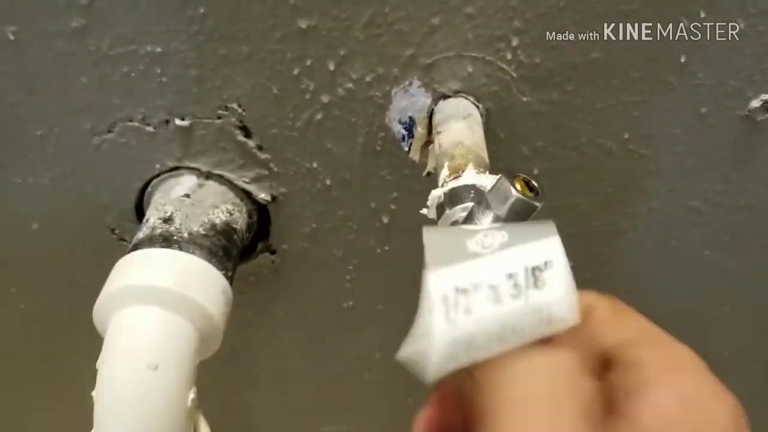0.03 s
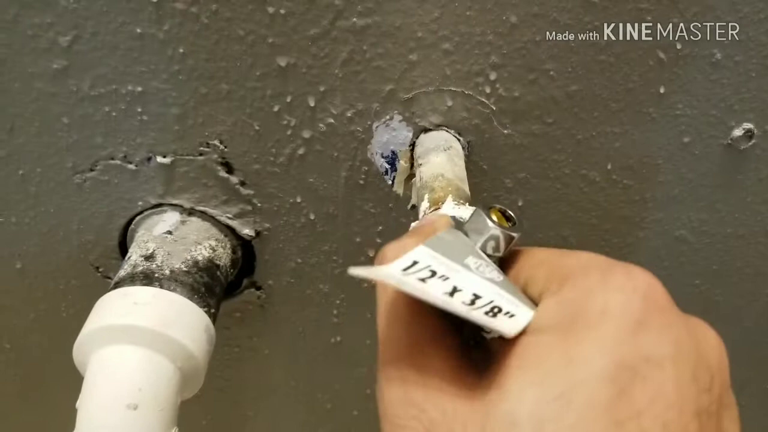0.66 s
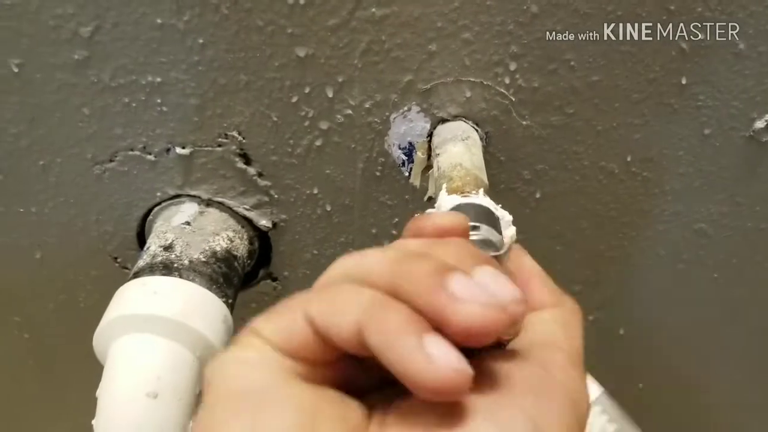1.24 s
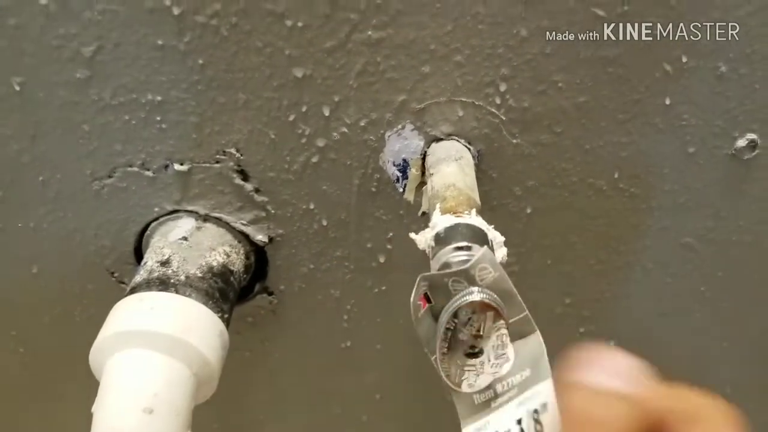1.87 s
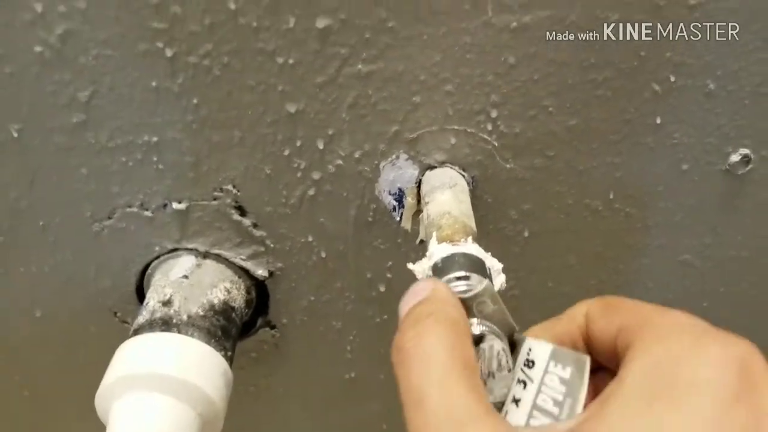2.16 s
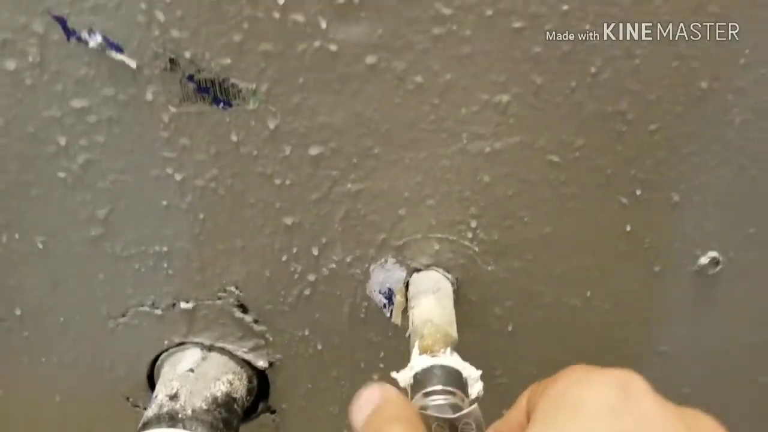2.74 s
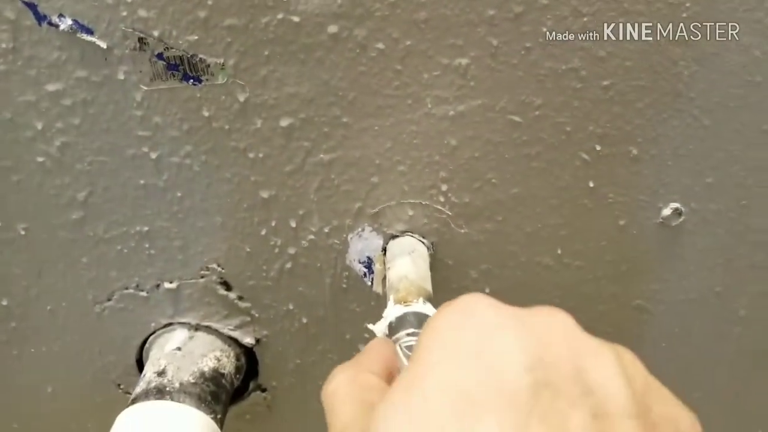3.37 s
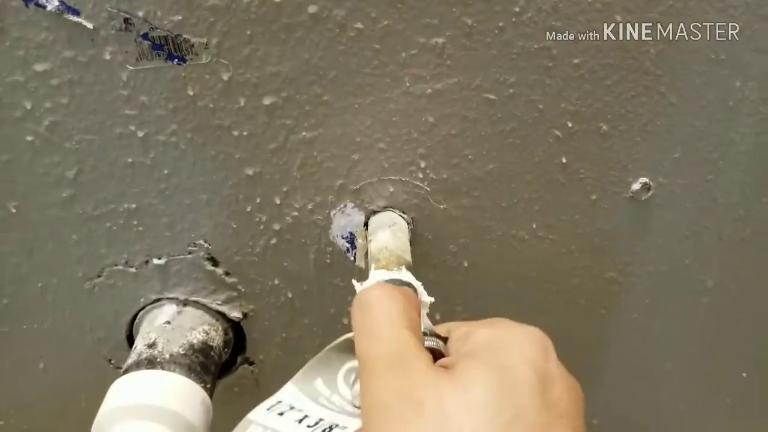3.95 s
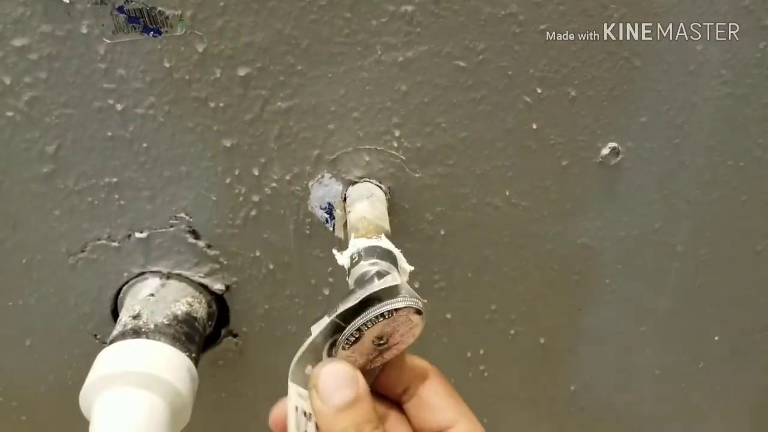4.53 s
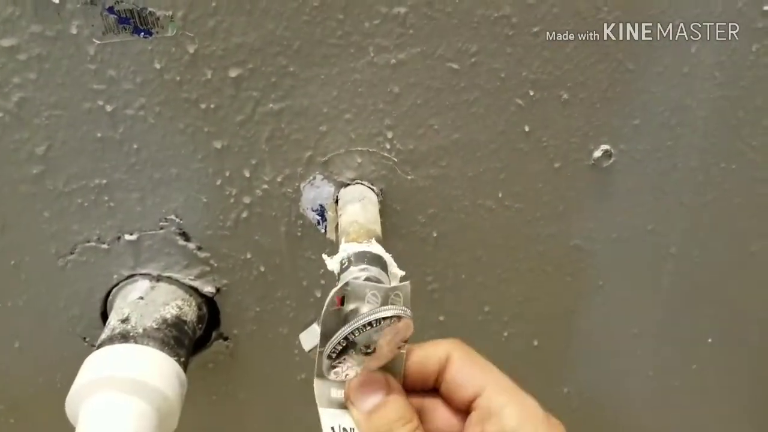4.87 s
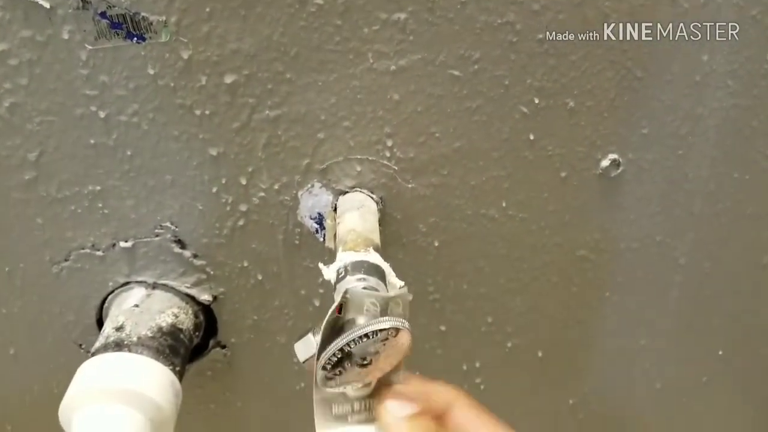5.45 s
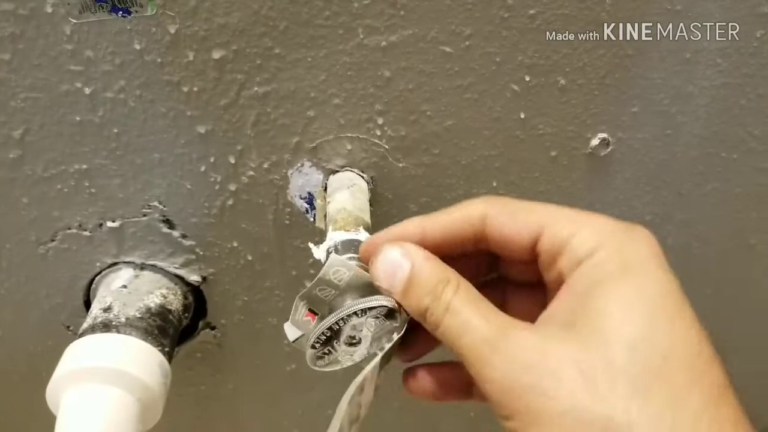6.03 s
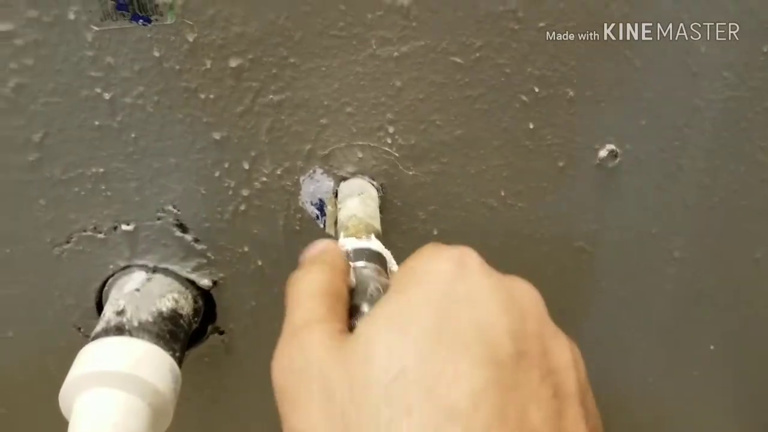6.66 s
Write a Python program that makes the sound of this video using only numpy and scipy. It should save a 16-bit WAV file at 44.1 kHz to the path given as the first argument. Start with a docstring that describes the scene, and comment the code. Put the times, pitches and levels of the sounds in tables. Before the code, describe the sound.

A hand screws a small valve onto a taped pipe, close to the microphone in a bare room with a short echo. From the start, skin and tape rustle in dry strokes while the valve's stiff tag flicks and crinkles. The threads give a brief rubbery squeal at about 0.5 seconds. At 1.5 seconds the tag clacks sharply, with a scraping rub and a soft boom from the hollow wall; more clicks follow around 2 seconds. From 2.5 to 4 seconds there are only light, sparse rubs. A loud double knock rings the valve at 4.1 seconds, followed by stronger rustling, crinkling, scraping and flapping, and a short low judder of the grip near 4.7. Lighter rubs and clicks lead to another firm knock at 5.8 seconds, then last rustles around 6.5. A faint hollow rub and low room rumble lie underneath.

```python
"""A bare, echoing room: close to the microphone, a hand screws a small shut-off valve onto a taped pipe stub.
Skin and tape rustle at each turn and the threads squeal. The valve's stiff tag flicks, clacks, crinkles,
scrapes and flaps against the hand. Knocks ring the valve, the hollow wall booms, and once the grip
judders. A faint hollow rub and a low room rumble lie underneath."""
import sys
import numpy as np
from scipy import signal
from scipy.fft import rfft, irfft, next_fast_len
from scipy.io import wavfile
from scipy.ndimage import uniform_filter1d, map_coordinates

SR = 44100
rng = np.random.default_rng(int(sys.argv[2]) if len(sys.argv) > 2 else 0)


def generate_wav(signal):
    """Clip the signal to [-1, 1] and save it as 16-bit WAV at the path in sys.argv[1]."""
    frames = np.transpose(np.atleast_2d(signal))
    scaled = np.clip(frames, -1, 1) * 32767
    pcm = np.round(scaled).astype(np.int16)
    wavfile.write(sys.argv[1], SR, pcm)


N = 295470
TIME = np.arange(N) / SR


# skin strokes: t/s, hold/s, level/dB, brightness/dB (dry skin sizzles, a soft pad swishes)
RUB_STROKES = [(0.0, 0.092, -38.5, 0.5), (0.08, 0.056, -36, 8.5), (0.196, 0.015, -32.5, 6.5),
               (0.245, .03, -39, 11.5), (0.4, 0.13, -40.5, 9), (0.473, 0.12, -43.5, 7),
               (0.865, 0.0091, -49.5, 2), (1.442, 0.055, -48, 0.5), (1.494, 0.21, -29.5, 7),
               (2.01, 0.048, -43.5, 5.5), (2.18, 0.038, -43.5, 12.5), (2.215, 0.0074, -33, 11),
               (2.292, 0.27, -45.5, 13), (2.383, 0.018, -40, 7), (2.662, 0.0029, -47, 14),
               (2.832, 0.015, -45.5, 8), (2.921, 0.0048, -43, 9), (3.125, 0.04, -44, 7.5),
               (3.733, 0.0051, -58.5, -22), (4.006, 0.015, -39.5, 2), (4.034, 0.026, -32.5, 12),
               (4.099, 0.099, -26.5, 4.5), (4.26, 0.12, -29.5, 7.5), (4.44, 0.085, -29.5, 7),
               (4.57, 0.054, -38.5, 12.5), (4.619, 0.083, -23.5, 10), (4.776, 0.055, -36.5, 12.5),
               (4.976, 0.05, -40.5, 8.5), (5.082, 0.024, -39.5, 6.5), (5.281, 0.018, -37.5, 12.5),
               (5.354, 0.06, -33, 9), (5.422, 0.038, -34.5, 11.5), (5.633, 0.018, -41.5, 2.5),
               (5.74, 0.064, -34.5, 7.5), (5.883, 0.033, -37.5, 4.5), (6.221, 0.056, -49.5, -7),
               (6.287, 0.0072, -39, -8.5), (6.435, 0.095, -33.5, 6), (6.576, 0.069, -35, 8.5)]
# friction spectrum: f/Hz, level/dB
RUB_SPECTRUM = [(880, -50.5), (1500, -25), (3480, -20), (4160, -16.5), (4780, -18.5), (4920, -13.5),
                (5220, -5.5), (7840, -5.5), (8740, -10.5), (9650, -6), (11900, -4.5), (14900, -6),
                (16000, -4.5)]

def rub(gain_db=0.6):
    """Skin ridges catch and slip on tape and valve as the grip wavers; now and then one snags."""
    friction = slips(per_s=7000, spread_db=2.5) + undb(-6) * slips(per_s=200, spread_db=2.5)
    grains = flicker_treble(colour(friction, RUB_SPECTRUM), depth_db=2, rate_hz=35)
    swish = colour(grains, [(20, 0), (7500, 0), (9500, -30), (16000, -50)])
    sizzle = unit(grains - swish) * undb(3 * walk(25))
    # brightness splits each stroke's power between swish and sizzle
    start_s, hold_s, db, bright_db = np.transpose(RUB_STROKES)
    swish_db = db - 10 * np.log10(1 + undb(bright_db) ** 2)
    rustle = np.zeros(N)
    for part, part_db in [(unit(swish), swish_db), (sizzle, swish_db + bright_db)]:
        strokes = zip(start_s, hold_s, part_db)
        rustle += part * pressure(strokes, attack_s=0.02, release_s=0.036, sag_db_per_s=20)
    return place(rustle * undb(gain_db + 2.4 * walk(130)), left_db=-15, room_db=-7.5)


# tag flicks: t/s, low/dB, mid/dB, treble/dB, room send/dB (capped in flicks), chatter/s
TAG_FLICKS = [(0.032, -7.5, -7, -11.5, 2, 0.0073), (0.22, -24, -26.5, -14, -18, 0.0024),
              (0.2926, -31, -11, -7.5, 4.5, 0.00086), (0.3145, -35.5, -1.5, 6.5, -12, 0.0084),
              (0.3221, -3.5, 4.5, 0, 4, 0.0041), (1.108, -6.5, -4, -26, 5.5, 0.018),
              (1.5139, 6.5, 11, 1, 0.5, 0.0015), (1.5169, 6.5, 12, -5, 2, .001),
              (1.649, 0.5, 9.5, 9, 1, 0.0015), (1.666, -4, 10.5, 2.5, -4, 0.017),
              (1.9427, -5.5, -4.5, -13, 1.5, .0015), (1.9625, 0.5, -2, -1.5, -1.5, 0.00096),
              (1.987, -12, -6, -16, 22, 0.019), (2.563, -44, -66, -7.5, -3.5, 0.0033),
              (4.0825, -26, 5, -2, -4, 0.0015), (4.126, 8, 6, -6.5, -5, .006),
              (4.2494, -13.5, -9, -12.5, 7.5, 0.0019), (4.3, -10.5, 1, -11, 6, 0.0035),
              (4.3938, -20.5, -1.5, -7, -14, 0.0024), (4.4393, -26, -1.5, 0.5, -7, 0.0094),
              (4.491, -28, -2.5, -8.5, 4, 0.01), (5.3425, -23, -63, 0.5, -0.5, 0.00079),
              (5.57, -6, -6, -12, -24, 0.029), (5.6129, -8, -3, -11.5, -12, 0.0021),
              (5.8258, -4, 2, -9.5, -24, 0.01)]
# tag resonances: f/Hz, width/Hz, level/dB
TAG_MODES = [(778.5, 450, -1), (1000, 110, -16.5), (1890, 230, -16), (2540, 670, -14.5), (4160, 300, -8)]

def flicks(chatter_db=-2, ring_db=-3, max_send_db=7, left_db=-11, room_db=-2):
    """The tag snaps free, chatters and rings; its facing sets how much goes to the walls."""
    direct, walls = np.zeros((2, N))
    t = np.arange(3072) / SR
    for start_s, low_db, mid_db, treble_db, send_db, chatter_s in TAG_FLICKS:
        # longer chatter: softer first contact, more energy after it
        contact = ((t == 0) + .4 * burst(t, .0005)) * np.exp(-chatter_s / .03)
        chatter = burst(t, chatter_s) * np.sqrt(chatter_s / .004)
        spectrum = [(60, low_db - 22), (350, low_db - 11), (650, low_db), (900, low_db),
                    (1600, mid_db), (3000, mid_db), (6000, treble_db), (15000, treble_db)]
        click = disperse(signal.fftconvolve(contact + undb(chatter_db) * chatter, snap(spectrum)))
        # each bend has passing resonances of its own
        bend_modes = [(hz, hz / 24, -1.5) for hz in 1000 * 7 ** rng.random(size=6)]
        click = .75 * (click + undb(ring_db) * ring(click, TAG_MODES) + ring(click, bend_modes))
        add(direct, start_s, click)
        add(walls, start_s, click * undb(min(send_db, max_send_db)))
    return ports(direct * undb(left_db), direct) + undb(room_db) * room(walls)


# tag edge strikes the valve handle, which rings: t/s, level/dB, f/Hz
TAG_CLACKS = [(0.066, -23, 1690), (1.5143, -7.5, 2028), (1.517, -6.5, 2900), (1.7557, -32.5, 1440),
              (1.9631, -10, 1750), (4.1163, -17.5, 480), (4.1452, -9.5, 1300)]

def clacks(fade_s=0.0012):
    """A sharp blow rings the valve's handle at a pitch set by where it is struck."""
    out = np.zeros(N)
    t = np.arange(1024) / SR
    for start_s, db, hz in TAG_CLACKS:
        add(out, start_s, undb(db) * np.sin(2 * np.pi * hz * t) * np.exp(-t / fade_s))
    return place(out, left_db=-11, room_db=-7)


# hand and tag on the valve: t/s, level/dB, contact/s, room send/dB
VALVE_KNOCKS = [(4.1162, 15, 0.00086, -2), (4.13, 13.5, 0.00035, -4), (4.1453, -14, 0.00064, -15),
                (5.5761, -2, 0.00038, -25), (5.761, 4, 0.002, -30), (5.8272, 15.5, 0.0019, -19)]
# valve body: f/Hz, width/Hz, level/dB
VALVE_MODES = [(438, 480, -19.5), (770, 330, -14.5), (1365, 200, -1), (1970, 240, 3.5)]

def knocks(gain_db=3, thud_db=-12, left_db=-12):
    """A push rings the valve's hollow, damped body; a soft pad stays longer and sounds duller."""
    direct, walls = np.zeros((2, N))
    t = np.arange(2048) / SR
    for start_s, db, contact_s, send_db in VALVE_KNOCKS:
        push = np.sin(np.pi * np.minimum(t / contact_s, 1)) ** 2
        knock = undb(db + gain_db) * (ring(push, VALVE_MODES) + undb(thud_db) * push) / push.sum()
        add(direct, start_s, knock)
        add(walls, start_s, knock * undb(send_db))
    return ports(direct * undb(left_db), direct) + room(walls)


# tag creases: t/s, length/s, level/dB, f/Hz
TAG_CRINKLES = [(0.245, 0.016, -41.5, 4350), (0.307, 0.026, -27, 11400), (0.512, 0.0083, -33, 6540),
                (1.671, 0.016, -25, 11700), (4.044, 0.062, -36, 5860), (4.243, 0.039, -32.5, 3020),
                (4.298, 0.0055, -19.5, 3950), (4.436, 0.0083, -25, 4000), (4.49, 0.023, -32, 2760),
                (4.51, 0.043, -43, 1000), (5.359, 0.045, -30, 12100), (5.712, 0.018, -37, 7060),
                (6.479, 0.024, -36.5, 13200), (6.478, 0.018, -37, 1740), (6.625, 0.049, -40.5, 6300)]

def crinkles(snaps_per_s=1600, spread_db=3, fold_q=2.1):
    """A crease runs through the tag as a cluster of tiny snaps, pitched by the size of the fold."""
    out = np.zeros(N)
    t = np.arange(int(.1 * SR)) / SR
    for start_s, length_s, db, hz in TAG_CRINKLES:
        size = undb(spread_db * np.minimum(rng.exponential(size=len(t)), 3))
        sign = rng.choice([-1, 1], len(t))
        snaps = (rng.random(len(t)) < snaps_per_s / SR) * size * sign
        swell = np.sqrt(np.abs(np.sin(np.pi * np.minimum(t / length_s, 1))))
        fold = [(hz, hz / fold_q, 0)]
        crease = ring(ring(snaps * swell, fold), fold)
        # facets beside the fold ring on briefly
        facets = [(f, f / 25, -1) for f in hz * 2 ** rng.uniform(-.4, .3, size=3)]
        crease = crease + ring(crease, facets)
        add(out, start_s, undb(db) * crease * np.sqrt(length_s * SR / np.sum(crease ** 2)))
    return place(out, left_db=-5.5, room_db=-9)


# tag edge drags: t/s, hold/s, level/dB
SCRAPE_STROKES = [(0.0, 0.016, -42), (0.215, 0.045, -43.5), (0.47, 0.094, -48), (1.488, 0.082, -35),
                  (2.225, 0.038, -45), (4.075, 0.072, -33), (4.25, 0.078, -41), (4.477, 0.045, -37),
                  (4.65, 0.073, -31), (6.44, 0.055, -48)]
# edge friction spectrum: f/Hz, level/dB
SCRAPE_SPECTRUM = [(180, -9.5), (300, -7), (380, -27.5), (765, -19), (969, -11), (2190, -3), (3010, -2.5),
                   (5200, -3), (7000, -13), (9100, -26), (15400, -79)]

def scrape(ring_db=-5, grip_db=2):
    """The tag's edge drags over the hand in coarse slips that ring its modes."""
    grains = colour(slips(per_s=900, spread_db=3), SCRAPE_SPECTRUM)
    grains = grains + undb(ring_db) * ring(grains, TAG_MODES)
    # waves return from the far edge; the path shifts as the contact slides
    path_s = .0009 * np.exp(.3 * walk(30))
    grains = unit(grains - .45 * np.interp(TIME - path_s, TIME, grains))
    drag = pressure(SCRAPE_STROKES, attack_s=0.018, release_s=0.0037, sag_db_per_s=-18.5)
    return place(grains * drag * undb(grip_db * walk(50)), left_db=-11, room_db=-8)


# tag flaps: t/s, level/dB, f/Hz
TAG_FLAPS = [(0.06, -47, 244), (0.524, -48, 129), (1.669, -43.5, 101.7), (1.963, -43.5, 222),
             (4.119, -33, 100), (4.137, -32.5, 122), (5.06, -53, 221), (5.757, -40.5, 285),
             (5.816, -47, 300)]

def flaps(gain_db=-4, rise_s=0.11, fade_s=0.016, flutter=0.61):
    """The whole tag bends and springs back with a soft, quickly damped throb."""
    out = np.zeros(N)
    t = np.arange(int(.15 * SR)) / SR
    envelope = (1 - np.exp(-t / rise_s)) * np.exp(-t / fade_s)
    for start_s, db, hz in TAG_FLAPS:
        crumple = unit(ring(rng.standard_normal(len(t)), [(142, 64, -1.7), (238, 39, 0.99)]))
        swing = np.sin(2 * np.pi * hz * t) + flutter * crumple
        add(out, start_s, undb(db) * swing * envelope / envelope.max())
    return place(out * undb(gain_db), left_db=2, room_db=-3)


# wall booms: t/s, level/dB, f/Hz
WALL_BOOMS = [(0.326, -43.5, 237), (1.514, -34.5, 219.3), (1.532, -37, 283.3), (1.975, -42, 308),
              (2.018, -41.5, 283.5), (4.243, -34, 289)]

def booms(gain_db=-3, rise_s=0.022, fade_s=0.022):
    """A jolt travels down the pipe; the hollow wall swells into one note and dies away."""
    out = np.zeros(N)
    t = np.arange(int(.3 * SR)) / SR
    envelope = (1 - np.exp(-t / rise_s)) * np.exp(-(t / fade_s) ** 2)
    for start_s, db, hz in WALL_BOOMS:
        add(out, start_s, undb(db) * np.sin(2 * np.pi * hz * t) * envelope / envelope.max())
    return place(out * undb(gain_db), left_db=0, room_db=-6)


# grip judder: t/s, hold/s, level/dB
JUDDER_STROKES = [(4.658, 0.11, -31.5)]
# shaken valve and tag: f/Hz, width/Hz, level/dB
JUDDER_MODES = [(115, 19, 4), (230, 16, 12.5), (280, 42, -3)]

def judder(slip_hz=117.3, sag_hz_per_s=39.4, rumble_db=-3):
    """The grip sticks and slips in a quick, uneven, slowing train that shakes valve and tag."""
    rate_hz = slip_hz - sag_hz_per_s * np.clip(TIME - JUDDER_STROKES[0][0], 0, 1)
    cycles = np.cumsum(rate_hz * (1 + .1 * walk(90))) / SR
    pulses = np.diff(np.floor(cycles), prepend=0) * undb(2 * walk(120))
    groan = unit(ring(ring(pulses, JUDDER_MODES), [(169, 400, 0)]))
    spectrum = [(45, -5), (110, 0), (170, -7), (280, 0), (400, -20), (900, -36), (4000, -70)]
    rumble = unit(colour(rng.standard_normal(N), spectrum))
    grip = pressure(JUDDER_STROKES, attack_s=0.016, release_s=0.022, sag_db_per_s=91)
    return place((groan + undb(rumble_db) * rumble) * grip, left_db=0, room_db=-20)


# squealing twists: t/s, hold/s, level/dB
SQUEAL_STROKES = [(0.465, 0.12, -41.5), (0.885, 0.019, -50.5), (0.98, 0.25, -70)]
# thread resonances: f/Hz, width/Hz, level/dB
SQUEAL_MODES = [(1930, 200, 0), (3100, 600, -13)]

def squeal(gain_db=1, grip_db=2):
    """The threads chatter on the tape and sing in two rough, rubbery bands."""
    song = ring(slips(per_s=1100, spread_db=2.5), SQUEAL_MODES)
    song = unit(colour(song, [(1500, 0), (4000, 0), (9000, -15)]))
    twist = pressure(SQUEAL_STROKES, attack_s=0.021, release_s=0.0055, sag_db_per_s=60)
    return place(song * twist * undb(gain_db + grip_db * walk(50)), left_db=-9, room_db=-9)


# rubs inside the cupped hand: t/s, hold/s, level/dB
HOLLOW_STROKES = [(0.24, .33, -58.5), (2.56, 0.6, -72), (5.15, 0.52, -67.5), (5.56, 0.015, -45.5),
                  (5.76, 0.071, -52)]

def hollow_rub(gain_db=-1):
    """Friction rings the air pocket of the closed hand; its note drifts as the hand turns."""
    pocket = [(381, 120, 4), (781, 180, -8.5)]
    tone = unit(ring(ring(slips(per_s=1200, spread_db=1.5), pocket), pocket))
    drift_s = np.cumsum(.025 * walk(9)) / SR
    tone = np.interp(TIME + drift_s, TIME, tone, period=N / SR)
    grip = pressure(HOLLOW_STROKES, attack_s=0.035, release_s=0.029, sag_db_per_s=-14.5)
    return place(tone * grip * undb(gain_db), left_db=-2.5, room_db=-11.5)


# room noise contour: t/s, level/dB
RUMBLE_LEVEL = [(0, -63.5), (.8, -75.5), (2.5, -74.5), (3.9, -67.5), (6.7, -65.5)]
# room noise spectrum: f/Hz, level/dB
RUMBLE_SPECTRUM = [(15, -42.5), (25, -21), (80, -8.5), (217, -21), (301, -23), (384, -31), (962, -36.5),
                   (5000, -33.5), (14800, -38.5), (16000, -47.5)]

def room_rumble():
    """Low rumble largely shared by both microphone ports, with a thin hiss that is not."""
    mid = colour(rng.standard_normal(N), RUMBLE_SPECTRUM)
    side = colour(rng.standard_normal(N), RUMBLE_SPECTRUM)
    side = colour(side, [(30, -4.5), (200, -9), (800, 0.5), (3000, 0.5)])
    level_db = np.interp(TIME, *np.transpose(RUMBLE_LEVEL)) + walk(8.2)
    return np.array([mid + side, mid - side]) / mid.std() * undb(level_db)


# wall echo bands: f/Hz, t60/s, level/dB
ECHO_BANDS = [(100, 1, -10.5), (300, 0.27, 6), (747, 0.29, -2), (2250, 0.35, -2), (4560, 0.29, 2.5),
              (14900, 0.16, -1)]

def room(x, cutoff_s=0.145):
    """Dense wall echoes, different at each port, cut short as by a noise suppressor."""
    t = np.arange(int(.4 * SR)) / SR
    hz = np.fft.rfftfreq(len(t), 1 / SR)
    noise = rfft(rng.standard_normal((2, len(t))))
    # long waves reach both ports more alike than short ones
    apart_rad = np.minimum(.45 + hz / 1000, 1) * np.pi / 2
    noise[0] = np.cos(apart_rad) * noise[1] + np.sin(apart_rad) * noise[0]
    window = np.clip((t - .001) / .002, 0, 1) * np.exp(-(t / cutoff_s) ** 8)
    tail = 0
    for k, (_, t60_s, db) in enumerate(ECHO_BANDS):
        band = along([(row[0], j == k) for j, row in enumerate(ECHO_BANDS)], hz)
        fade = window * np.exp(-np.log(1000) * t / t60_s)
        tail = tail + undb(db) * irfft(noise * band, len(t)) * fade / np.linalg.norm(fade)
    return signal.fftconvolve(x[None], tail, axes=1)[:, :N]


# left port delay as the microphone shifts: t/s, lag/s
LEFT_LAG = [(0, 0.000062), (2.3, .00002), (4, 0.00017)]
# left port response: f/Hz, level/dB
LEFT_SPECTRUM = [(20, -3.5), (300, 2), (1300, -4), (3200, -4.5), (6500, 4.5), (10000, -4.5)]

def ports(left, right, wall_db=-4):
    """Sound reaches the right port first; the left also catches a bounce off the wall behind the pipe."""
    lag_s = np.interp(TIME, *np.transpose(LEFT_LAG))
    bounce_s = .0012 + .0002 * walk(3)
    direct = map_coordinates(left, [(TIME - lag_s) * SR], order=3)
    bounce = map_coordinates(left, [(TIME - lag_s - bounce_s) * SR], order=3)
    return np.array([colour(direct + undb(wall_db) * bounce, LEFT_SPECTRUM), right])


def place(x, left_db, room_db):
    """A source at the valve: direct sound plus the room."""
    return ports(x * undb(left_db), x) + undb(room_db) * room(x)


def pressure(strokes, attack_s, release_s, sag_db_per_s):
    """Gain of (t/s, hold/s, level/dB) strokes: press in, ease (negative sag: tighten), let go."""
    power, t = np.zeros(N), TIME[:SR]
    for start_s, hold_s, db in strokes:
        press = np.minimum(t / attack_s, 1) ** 2
        let_go = np.exp(-np.maximum(t - attack_s - hold_s, 0) / release_s)
        add(power, start_s, (press * let_go * undb(db - sag_db_per_s * t)) ** 2)
    return np.sqrt(power)


def slips(per_s, spread_db):
    """Tiny friction slips at random times: many weak, a few strong."""
    size = undb(spread_db * np.minimum(rng.exponential(size=N), 5))
    return unit((rng.random(N) < per_s / SR) * size * rng.choice([-1, 1], N))


def burst(t, fade_s):
    """Fading spray of tiny contacts, unit energy."""
    spray = rng.standard_normal(len(t))
    spray = spray * np.abs(spray) * np.exp(-t / fade_s)
    return spray / np.linalg.norm(spray)


def snap(points):
    """Minimum-phase click with a spectrum of (f/Hz, level/dB) points."""
    cepstrum = irfft(np.log(undb(along(points, np.fft.rfftfreq(1024, 1 / SR)))))
    cepstrum[1:512] *= 2
    cepstrum[513:] = 0
    return irfft(np.exp(rfft(cepstrum)))


def disperse(x):
    """Bending waves in a thin sheet: highs arrive before lows."""
    hz = np.fft.rfftfreq(len(x), 1 / SR)
    return irfft(rfft(x) * np.exp(-1j * np.sqrt(hz / 14)), len(x))


def flicker_treble(x, depth_db, rate_hz):
    """Half-octave treble bands swell and fade independently."""
    size = next_fast_len(N, True)
    hz, spectrum = np.fft.rfftfreq(size, 1 / SR), rfft(x, size)
    centres_hz = 2800 * np.sqrt(2) ** np.arange(6)
    out = np.zeros(N)
    for centre_hz in centres_hz:
        band = along([(f, f == centre_hz) for f in centres_hz], hz)
        out += irfft(spectrum * band, size)[:N] * undb(depth_db * walk(rate_hz))
    return unit(out)


def ring(x, modes):
    """Sum of (f/Hz, width/Hz, level/dB) resonances."""
    return sum(undb(db) * signal.lfilter(*signal.iirpeak(hz, hz / width_hz, SR), x)
               for hz, width_hz, db in modes)


def colour(x, points):
    """Filter by (f/Hz, level/dB) points, falling steeply below the first."""
    size = next_fast_len(N, True)
    hz = np.fft.rfftfreq(size, 1 / SR)
    low_cut = np.minimum(hz / points[0][0], 1) ** 2
    return irfft(rfft(x, size) * undb(along(points, hz)) * low_cut, size)[:N]


def along(points, hz):
    """Read (f/Hz, value) points on a log-frequency axis."""
    f, value = np.transpose(points)
    return np.interp(np.log(hz + 1), np.log(f), value)


def walk(rate_hz):
    """Random wander with a spread near 1."""
    knots = rng.standard_normal(4000)
    return 1.2 * np.interp(TIME * rate_hz, np.arange(len(knots)), knots)


def add(track, start_s, sound):
    """Mix a short sound into a track."""
    i = max(int(start_s * SR), 0)
    track[i:i + len(sound)] += sound[:N - i]


def undb(db):
    """Decibels to gain."""
    return 10 ** (np.asarray(db) / 20)


def unit(x):
    """Scale to rms 1."""
    return x / np.sqrt(np.mean(x ** 2))


def suppress_echo(x, below_db=-19, memory_s=0.037, min_gain_db=-12):
    """Duck each band once it falls far below its own recent level."""
    spectra = signal.stft(x, nperseg=512)[2]
    power = uniform_filter1d(np.mean(np.abs(spectra) ** 2, axis=0), size=7, axis=0) + 1e-20
    keep = np.exp(-256 / SR / memory_s)
    recent = signal.lfilter([1 - keep], [1, -keep], power)
    gain = np.maximum(power / (power + undb(below_db) ** 2 * recent), undb(min_gain_db))
    return signal.istft(spectra * gain)[1][:, :N]


def scene():
    """Impacts and friction at the valve, over the quiet room."""
    impacts = flicks() + clacks() + knocks() + booms() + crinkles() + flaps()
    friction = rub() + scrape() + squeal() + hollow_rub() + judder()
    return impacts + friction + room_rumble()


def record(dry):
    """Thin the deepest bass, chop echo tails, round the sharpest peaks, cut the top."""
    low_hz, top_hz, ceiling = 44, 15800, .85
    thinned = signal.sosfilt(signal.butter(3, low_hz, "high", fs=SR, output="sos"), dry)
    rounded = ceiling * np.tanh(suppress_echo(thinned) / ceiling)
    return signal.sosfilt(signal.ellip(10, .2, 70, top_hz, fs=SR, output="sos"), rounded)


dry = scene()
out = record(dry)
generate_wav(out)
```